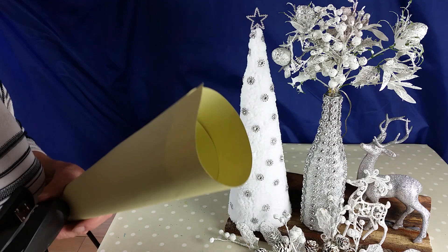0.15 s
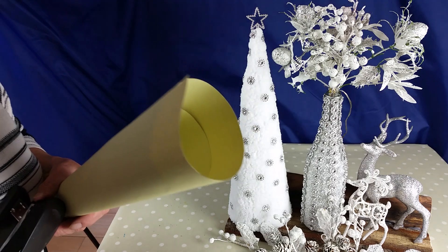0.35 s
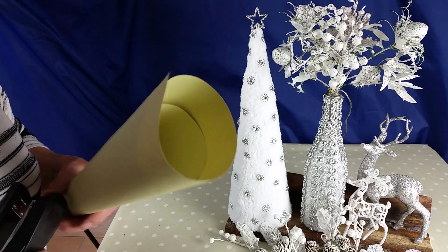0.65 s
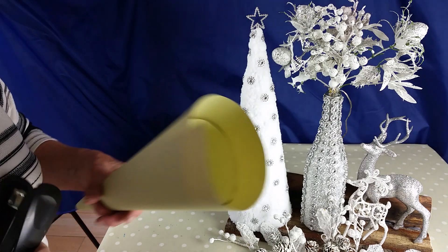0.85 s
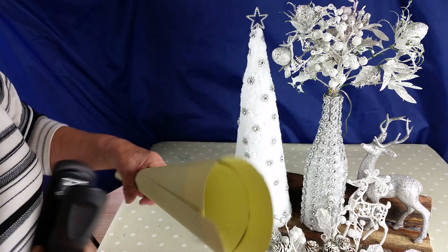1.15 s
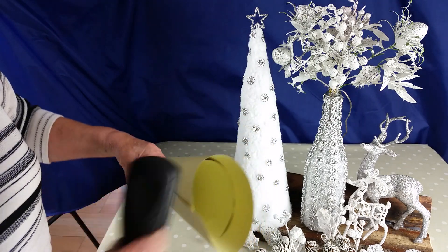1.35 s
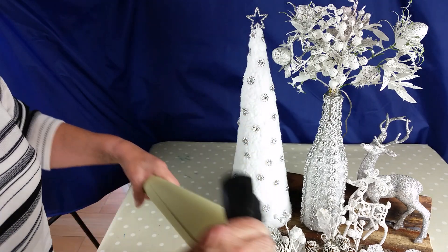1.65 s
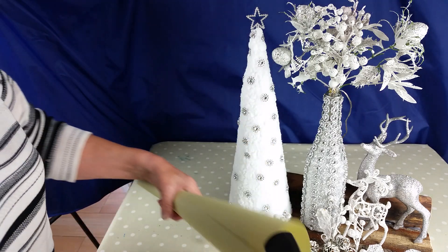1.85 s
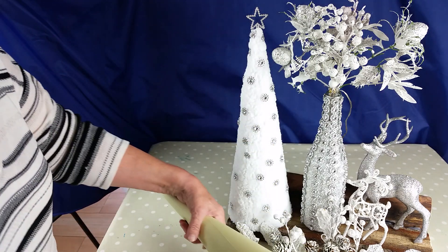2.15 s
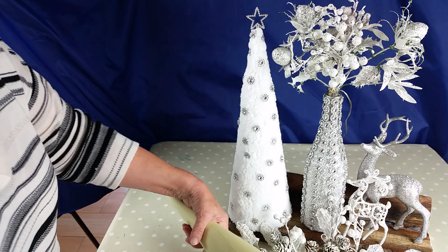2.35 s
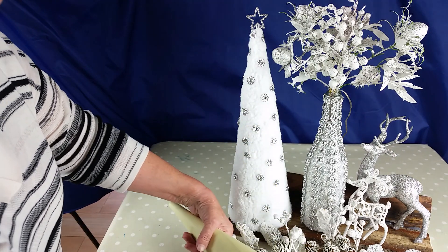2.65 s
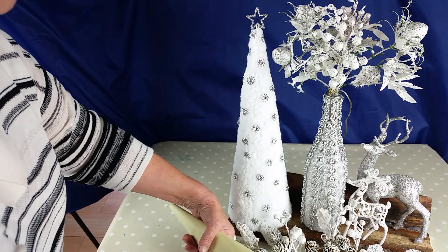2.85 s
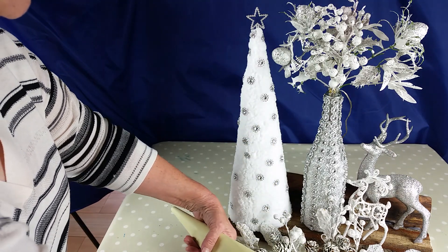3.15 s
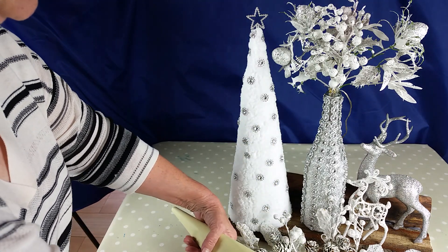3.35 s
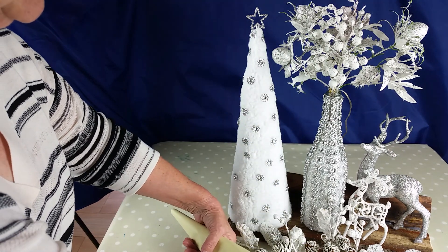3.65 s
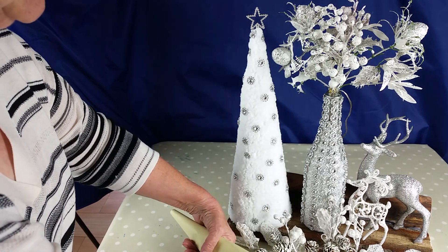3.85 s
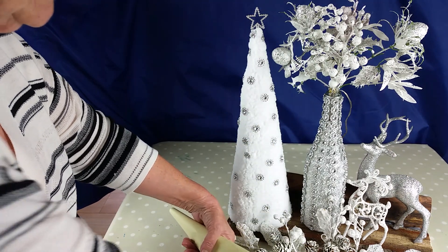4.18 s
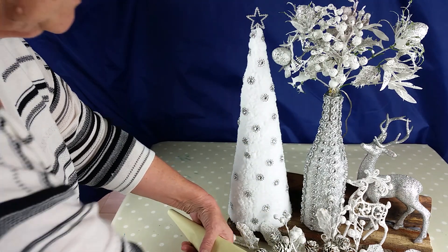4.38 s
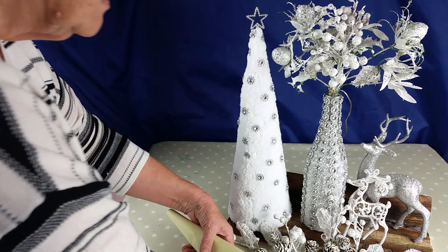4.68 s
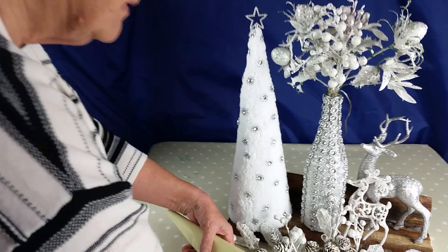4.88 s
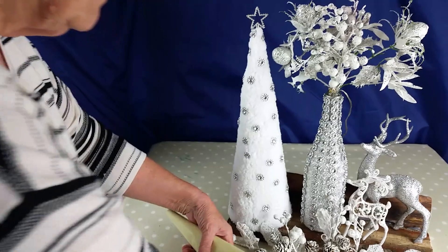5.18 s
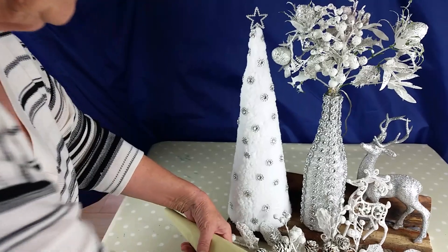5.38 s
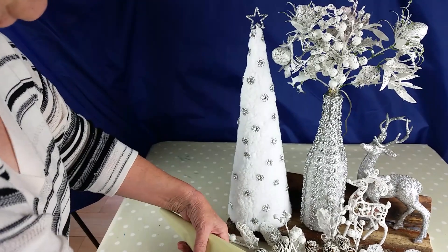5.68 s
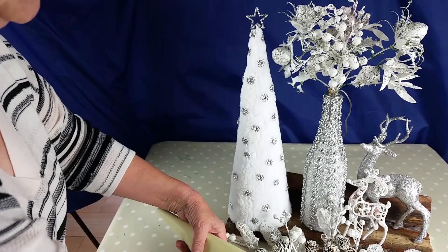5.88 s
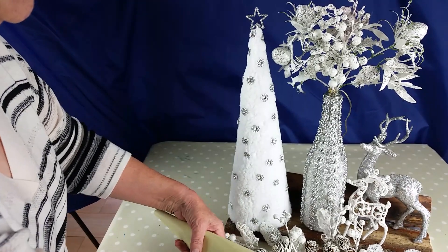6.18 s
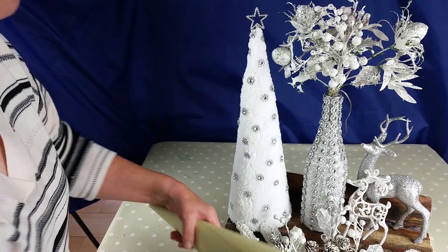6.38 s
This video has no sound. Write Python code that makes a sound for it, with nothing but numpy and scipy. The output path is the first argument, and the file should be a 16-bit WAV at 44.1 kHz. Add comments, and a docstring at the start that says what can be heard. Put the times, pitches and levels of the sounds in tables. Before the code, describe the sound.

A close stereo microphone in a small, slightly reverberant room, with very quiet low background air. From 0 to 1 s hands rub a stiff paper cone with dry, sparse crackles, while a loose stapler arm gives thin metal ticks. From 1 to 2 s it is quieter, with faint ticks and a tiny squeak near 1.6. A hollow paper tap sounds at 2.2, then rustling and smaller taps around 2.6 to 2.9. A firm clack lands at 3.0. At 3.65 to 3.8 the stapler presses shut with clacks, rattle, bright jingle and table boom. A lighter click comes at 4.4, then the loudest cluster at 4.65 to 4.95, heavy and booming. Smaller clacks and a short metallic ping follow at 5.25 to 5.4. Soft paper taps lead to a scrape from 5.9 to 6.2, rising in pitch and ending in a knock; a faint jolt follows at 6.4.

```python
"""Hands rub and tap a stiff paper cone as friction noise and short contacts; the stapler's loose arm ticks and squeaks.
Then the stapler, fitted over the seam, is pressed shut on a cloth-covered table in a small room: it clacks as
bursts ringing its arm, its spring jingles as wavering modes, and the table booms as a bank of decaying modes.
Near the end the stapler scrapes out of the cone, heard as friction and a rising resonance, and a last jolt follows."""
import sys
import numpy as np
from scipy import signal
from scipy.fft import rfft, irfft, next_fast_len
from scipy.io import wavfile

SR = 44100
rng = np.random.default_rng(int(sys.argv[2]) if len(sys.argv) > 2 else 0)


def transcribe(signal):
    """Save signal, clipped to [-1, 1], as a 16-bit WAV file at the path in sys.argv[1]."""
    frames = np.atleast_2d(signal).T
    limited = np.clip(frames, -1, 1)
    pcm = np.round(limited * 32767).astype(np.int16)
    wavfile.write(sys.argv[1], SR, pcm)


N = 287732
TIME = np.arange(N) / SR
BLOW = TIME[:SR // 4]   # time axis of one burst

# steady background air, spectrum: frequency_hz, level_db
AIR_SPECTRUM = [(25, -36), (50, -7.5), (85, 3), (130, 1), (250, -3.5), (370, -6.5), (600, -14), (1000, -26),
                (2000, -28), (3700, -35.5), (5000, -38), (8500, -62), (12500, -37.5), (16000, -41.5)]
AIR_DB = -54
# decay of the room: frequency_hz, t60_s
ROOM_DECAY = [(100, 0.61), (400, 0.37), (1200, 0.43), (4000, 0.4), (8000, 0.45), (14000, 0.28)]
# reverberant level: frequency_hz, level_db
ROOM_LEVEL = [(80, -14), (200, -14), (500, -7.5), (1500, -9.5), (5000, -9.5), (13000, -9.5)]
# balance of the two microphone ports: frequency_hz, left_minus_right_db
PORT_BALANCE = [(60, 0.5), (87, 0.0), (130, 0.0), (180, 0.0), (260, 0.0), (380, 0.0), (550, 0.0),
                (790, 0.0), (1140, 0.5), (1650, 0), (2380, -1), (3440, -4.5), (4970, -9.5), (7180, -6.5),
                (10400, 4), (15000, 0)]
CUTOFF_HZ = 16000

# pushes and knocks on the table: start_s, level_db, hardness_db (upper modes gain what the deepest loses)
TABLE_BLOWS = [(3.644, -7.5, 8.5), (3.700, -8.5, 6), (3.911, -31.5, -2), (4.428, -38, -7),
               (4.705, -17.5, 1), (4.827, -7, 3.5), (4.945, -9, -10), (4.976, -19.5, 6.5),
               (5.266, -27.5, 10.5), (5.369, -24, -3.5), (5.683, -37, 3.5), (5.81, -30, -1),
               (6.143, -24, 9), (6.160, -14, 2), (6.41, -23, -5)]
# modes of the table top: pitch_hz, level_db, t60_s
TABLE_MODES = [(52, -13, 0.55), (80.5, -1.5, 0.28), (139.4, 4, 0.18), (153.8, 2, 0.12), (191.6, -6.5, 0.3),
               (227.7, -10, 0.39), (273.3, 0, 0.2), (331.4, -3.5, 0.19), (372.6, -9, 0.3),
               (397, -14.5, 0.37), (442.2, -10, 0.38), (508, -16.5, 0.34), (556, -29.5, 0.1),
               (658, -20, 0.32)]
THUMP_DEEP_DB, THUMP_UPPER_DB = -10.5, -9   # relative to the main modes
# knock on the hollow case: dB for a thump of 0 dB, dB per dB of thump, decay constant in s
CASE_DB, CASE_GROWTH, CASE_CRUNCH_S = -3.5, 1.414, 0.015

# strokes of the hands over the paper: start_s, length_s, level_db
STROKES = [(-.05, 0.4, -48), (.42, .12, -48), (.6, 0.14, -50.5), (0.795, 0.18, -55.5), (1.097, 0.59, -62.5),
           (2.373, 0.36, -58), (2.666, 0.39, -53.5), (2.826, 0.016, -44), (3.1, .13, -47),
           (3.459, 0.46, -56), (4.1, .2, -67), (4.332, .25, -50), (4.603, .05, -41.5), (5.192, 0.11, -45.5),
           (6.398, .12, -58)]
STROKE_ATTACK_S, STROKE_RELEASE_T60_S = 0.024, 0.58
# rubbed paper, spectrum: frequency_hz, level_db
PAPER_SPECTRUM = [(120, -11), (250, -3), (450, -2), (650, -7), (800, -3.5), (1200, -7.5), (1450, -12),
                  (2800, -19), (4400, -19), (5500, -26), (7000, -32.5), (8400, -49), (12000, -30),
                  (16000, -30.5)]
# the stiff paper cone is tapped or snaps: start_s, click_db, hollow_knock_db
CONE_TAPS = [(0.034, -33.5, -32.5), (0.505, -60, -44), (0.650, -48, -60), (0.738, -47, -40.5),
             (2.190, -27, -21), (2.606, -48, -35), (2.659, -34.5, -28), (2.77, -51, -32.5),
             (2.857, -38, -42), (3.623, -57, -40.5), (5.588, -57, -45), (5.682, -47.5, -40.5),
             (5.942, -47, -37), (5.955, -45, -26)]
# modes of the air in the cone: pitch_hz, level_db, t60_s
CONE_MODES = [(388, -17, 0.53), (474, 0, 0.23), (581, -12, 0.41), (851, -17, 0.52)]
TAP_CRUNCH_S, CONE_LOWEST_HZ = 0.0015, 190
TAP_EDGE_DB, CONE_RING_DB = -46, -13   # relative to the click; relative to the knock

# click of a contact, spectrum: frequency_hz, level_db
CLICK_SPECTRUM = [(400, -29), (700, -2.5), (830, 4), (980, 5.5), (1180, -0.5), (1480, 2), (1640, 0),
                  (1800, 0), (2000, 0.5), (2240, -1), (2650, -7), (3600, -5.5), (4400, -6.5), (5300, -14.5),
                  (6600, -18.5), (7600, -31), (12000, -46)]
# knock on the hollow body, spectrum: frequency_hz, level_db
KNOCK_SPECTRUM = [(60, -53), (150, -13.5), (260, -8), (330, -1.5), (400, -6.5), (470, 0.5), (620, -9.5),
                  (760, -9.5), (950, -8), (1400, -21.5), (4000, -58)]
# bright metal or paper edge, spectrum: frequency_hz, level_db
EDGE_SPECTRUM = [(3000, -22), (4500, -3.5), (5500, -13.5), (6600, -8.5), (8500, -17.5), (10500, -5),
                 (13000, 0.5), (15500, -4.5)]

# the staple spring is shaken: start_s, low_hum_db, high_jingle_db
SPRING_SHAKES = [(3.694, -44, -32), (4.702, -21.5, -47), (4.845, -26.5, -23), (5.29, -30.5, -39.5),
                 (5.361, -34.5, -34), (6.426, -45, -60)]
# low modes of the spring: pitch_hz, peak_db, t60_s
HUM_MODES = [(1210, 0, .24), (1271, -14, .12), (1513, -15, .18), (1915, -17, .2), (2143, -19, .14)]
# high modes of the spring: pitch_hz, peak_db, t60_s
JINGLE_MODES = [(6400, -17, .09), (9598, -16, .09), (11300, -17, .04), (12900, -7, .05), (13005, 0, .085),
                (13120, -8, .05), (15120, -10, .06)]
# the stapler slips in the grip: start_s, length_s, starting_pitch_hz, peak_db
SLIPS = [(1.614, 0.074, 4800, -64), (2.595, 0.0044, 4250, -41.5)]
# the loose arm ticks in the hand: start_s, click_db, arm_ring_db, ring_tilt_db_per_octave
ARM_TICKS = [(0.169, -41, -39.5, 5), (0.295, -49, -39.5, -6), (0.307, -39.5, -38, 0), (0.38, -58, -41, -8),
             (0.884, -41, -36, -1), (1.387, -42.5, -48, 3), (1.444, -43, -49, 3), (1.543, -52, -61, 6),
             (1.687, -60, -67, 6), (2.057, -57.5, -65.5, 13.5), (4.297, -55, -63, 4),
             (4.388, -46.5, -53, 8)]
TICK_CRUNCH_S = 0.01
TICK_KNOCK_DB, TICK_EDGE_DB, TICK_JINGLE_DB = -15.5, -18.5, -15   # relative to the click
# modes of the arm: pitch_hz, level_db, t60_s
ARM_MODES = [(1169, 2, 0.076), (2150, -19, 0.26), (4060, -13, 0.051), (4476, -13.5, 0.035)]
# loose parts rattle while the stapler moves: start_s, length_s, contact_db
RATTLE_RUNS = [(3.647, .1, -35), (4.681, .04, -34), (4.838, .06, -31), (4.949, .035, -36.5),
               (5.277, .007, -26), (5.34, .035, -33.5), (6.158, .04, -32), (6.419, .035, -41)]
RATTLE_GAP_S, RATTLE_SPREAD_DB, RATTLE_CRUNCH_S = 0.008, 2.0, 0.0083
RATTLE_KNOCK_DB, RATTLE_EDGE_DB = -2.5, -6.5   # relative to the click

# the scrape out of the cone: time_s, scrape_db, resonance_db, resonance_hz
SLIDE_CURVE = [(5.90, -65, -55.5, 300), (5.935, -50.5, -44, 420), (5.96, -41, -30, 483),
               (6.0, -36.5, -41, 518), (6.05, -33.5, -49, 1000), (6.09, -34.5, -39, 1300),
               (6.135, -31, -41, 1700), (6.19, -23, -39, 2000), (6.22, -71, -73, 2000)]
# scraped cone, spectrum: frequency_hz, level_db
SCRAPE_SPECTRUM = [(120, -25), (200, -8), (409, -31), (456, -3.5), (709, -18), (933, -2), (1120, -9),
                   (1230, -12), (1680, -16.5), (1870, -13), (2750, -22.5), (4270, -23), (8120, -42.5),
                   (12200, -35.5), (16000, -38)]
# the stapler clacks against cone, anvil and table: start_s, click_db, crunch_s
STAPLER_CLACKS = [(3.019, -16, 0.01), (3.698, -25.5, .0035), (3.746, -23, 0.0078), (3.781, -37, .0017),
                  (4.426, -32.5, 0.005), (4.664, -23, 0.012), (4.696, -17.5, 0.0077),
                  (4.827, -12.5, 0.0042), (4.937, -21, 0.0051), (4.943, -18.5, 0.0035),
                  (5.262, -33, 0.0046), (5.312, -26.5, 0.0022), (5.367, -26, 0.0068), (6.042, -29.5, 0.005),
                  (6.142, -22, 0.002)]
CLACK_KNOCK_DB, CLACK_EDGE_DB, CLACK_RING_DB = -2.5, -14.5, -15   # relative to the click
CLACK_TILT_DB_PER_OCTAVE = 5.5
# the jaw springs open against its stop
STOP_S, STOP_HZ, STOP_DB, STOP_T60_S = 5.366, 1410, -13, 0.024


def from_db(db):
    """Level law: 20 dB is a factor of ten in amplitude."""
    return 10 ** (np.asarray(db) / 20)


def rms_one(x):
    """Normalization: the root mean square becomes 1."""
    return x / np.sqrt(np.mean(x ** 2) + 1e-20)


def at_hz(points, hz):
    """Interpolation: values are joined linearly over logarithmic frequency."""
    known_hz, values = np.transpose(points)
    return np.interp(np.log(np.maximum(hz, 1)), np.log(known_hz), values)


def add(track, start_s, sound):
    """Superposition: a sound is summed into the track at its time."""
    start = round(start_s * SR)
    track[start:start + len(sound)] += sound[:N - start]


def colour(x, spectrum):
    """Minimum phase: a folded cepstrum makes a causal filter with the given spectrum."""
    size = 2 * next_fast_len(len(x))
    gain = from_db(at_hz(spectrum, np.fft.rfftfreq(size, 1 / SR)))
    cepstrum = irfft(np.log(gain))
    cepstrum[1:size // 2] *= 2
    cepstrum[size // 2 + 1:] = 0
    response = np.exp(rfft(cepstrum))
    return irfft(rfft(x, size) * response)[:len(x)]


def dying(t, t60):
    """Exponential decay: the amplitude falls by 60 dB in t60 seconds."""
    return np.exp(-np.log(1000) * t / t60)


def mode(hz, t60):
    """Modal vibration: one second of a damped sine."""
    t = TIME[:SR]
    return np.sin(2 * np.pi * hz * t) * dying(t, t60)


def grains(per_s, spread_db):
    """Dry friction: noise whose strength varies from fibre to fibre."""
    steps = rng.standard_normal(N)
    strength_db = spread_db * np.interp(TIME * per_s, np.arange(N), steps)
    return rng.standard_normal(N) * from_db(strength_db)


def burst(crunch_s, spectrum, snap, ring_db, ring_t60):
    """Impact: a pulse, a crunch of tiny contacts and a dense ring, with the energy of 5 ms at level 1."""
    envelope = np.exp(-BLOW / crunch_s) + from_db(ring_db) * dying(BLOW, ring_t60)
    force = rng.standard_normal(len(BLOW)) * envelope
    force[0] += snap * np.linalg.norm(force)
    sound = colour(force, spectrum)
    return sound / np.linalg.norm(sound) * np.sqrt(0.005 * SR)


def contact(click_db, knock_db, edge_db, crunch_s):
    """Parallel radiation: a contact clicks, knocks on case and cone, and has a bright edge."""
    click = burst(crunch_s, CLICK_SPECTRUM, snap=0.31, ring_db=-8, ring_t60=0.17)
    knock = burst(crunch_s, KNOCK_SPECTRUM, snap=0.43, ring_db=-16, ring_t60=0.31)
    edge = burst(crunch_s, EDGE_SPECTRUM, snap=0.13, ring_db=-7.5, ring_t60=0.091)
    return from_db(click_db) * click + from_db(knock_db) * knock + from_db(edge_db) * edge


def background_air():
    """Stationary random noise: the air has a constant level and spectrum."""
    return from_db(AIR_DB) * rms_one(colour(rng.standard_normal(N), AIR_SPECTRUM))


def room(x, first_echo_s):
    """Diffuse reverberation: a noise tail swells, then dies at its own rate in each octave."""
    t = TIME[:SR]
    tail = np.zeros(SR)
    white, hz = rfft(rng.standard_normal(SR)), np.fft.rfftfreq(SR, 1 / SR)
    onset = 1 - np.exp(-(t / first_echo_s) ** 2)
    for low_hz in 40 * 2 ** np.arange(9):
        octave = irfft(white * ((hz >= low_hz) & (hz < 2 * low_hz)), SR)
        envelope = dying(t, at_hz(ROOM_DECAY, low_hz * np.sqrt(2))) * onset
        tail += octave * envelope / np.linalg.norm(envelope)
    return signal.fftconvolve(x, colour(tail, ROOM_LEVEL))[:N]


def table_boom(load_spread):
    """Modal superposition: neighbours start in opposite directions, so the boom swells; the hand's load detunes them."""
    out = np.zeros(N)
    for start_s, main_db, hard_db in TABLE_BLOWS:
        deep_db = main_db + THUMP_DEEP_DB - hard_db
        upper_db = main_db + THUMP_UPPER_DB + hard_db
        blow = [(86, deep_db), (130, main_db), (170, main_db), (280, upper_db)]   # frequency_hz, level_db
        loads = 1 + load_spread * rng.standard_normal(len(TABLE_MODES))
        for k, (hz, db, t60) in enumerate(TABLE_MODES):
            amplitude = (-1) ** k * from_db(at_hz(blow, hz) + db)
            add(out, start_s, amplitude * mode(hz * loads[k], t60))
        case = burst(CASE_CRUNCH_S, KNOCK_SPECTRUM, snap=0.44, ring_db=-6, ring_t60=0.39)
        add(out, start_s, from_db(CASE_DB + CASE_GROWTH * main_db) * case)
    return out


def handling():
    """Envelope of strokes: each swells, holds and dies away, and the strongest sets the level."""
    strokes = []
    for start_s, length_s, db in STROKES:
        attack = np.clip((TIME - start_s) / STROKE_ATTACK_S, 0, 1)
        release = dying(np.maximum(TIME - start_s - length_s, 0), STROKE_RELEASE_T60_S)
        strokes.append(from_db(db) * attack * release)
    return np.max(strokes, axis=0)


def paper(most_crackles_per_s, crackle_db):
    """Friction and buckling: harder handling makes the rubbed sheet crackle more often, up to a limit."""
    level = handling()
    per_s = most_crackles_per_s * np.minimum(level / level[0], 1)   # the opening level reaches the limit
    pulses = (rng.random(N) < per_s / SR) * (2 * rng.random(N) - 1)
    snap = burst(0.0033, PAPER_SPECTRUM, snap=0.96, ring_db=-18.5, ring_t60=0.05)
    crackles = signal.fftconvolve(pulses, snap)[:N]
    rub = rms_one(colour(grains(per_s=300, spread_db=0.3), PAPER_SPECTRUM))
    return level * (rub + from_db(crackle_db) * crackles)


def taps():
    """Cavity resonance: short paper contacts with little edge or bass leave the air in the cone ringing."""
    out = np.zeros(N)
    hollow = sum(from_db(db) * mode(hz, t60) for hz, db, t60 in CONE_MODES)
    for start_s, click_db, knock_db in CONE_TAPS:
        add(out, start_s, contact(click_db, knock_db, click_db + TAP_EDGE_DB, TAP_CRUNCH_S))
        add(out, start_s, from_db(knock_db + CONE_RING_DB) * hollow)
    high_pass = signal.butter(2, CONE_LOWEST_HZ, "high", fs=SR, output="sos")
    return signal.sosfilt(high_pass, out + 1e-18)


def coil_ring(modes, swell_s, linewidth_hz):
    """Phase diffusion: coils take a moment to get going, and their pitch wavers as they touch."""
    t = TIME[:SR]
    out = np.zeros(SR)
    for hz, db, t60 in modes:
        envelope = (1 - np.exp(-(t / swell_s) ** 2)) * dying(t, t60)
        waver = np.cumsum(rng.standard_normal(SR)) * np.sqrt(2 * np.pi * linewidth_hz / SR)
        tone = np.sin(2 * np.pi * hz * t + waver)
        out += from_db(db) * tone * envelope / envelope.max()
    return out


def jingle():
    """High modal series: the bright ring of the spring."""
    return coil_ring(JINGLE_MODES, swell_s=0.0058, linewidth_hz=40.7)


def spring():
    """Shock excitation: a jolt makes the staple spring hum and jingle."""
    out = np.zeros(N)
    for start_s, hum_db, jingle_db in SPRING_SHAKES:
        hum = coil_ring(HUM_MODES, swell_s=0.0065, linewidth_hz=6.0)
        add(out, start_s, from_db(hum_db) * hum + from_db(jingle_db) * jingle())
    return out


def squeaks(sag):
    """Stick-slip oscillation: a thin short tone falls by the fraction sag."""
    out = np.zeros(N)
    for start_s, length_s, hz, db in SLIPS:
        progress = np.linspace(0, 1, round(length_s * SR))
        phase = 2 * np.pi * np.cumsum(hz * (1 - sag * progress)) / SR
        add(out, start_s, from_db(db) * np.sin(np.pi * progress) * np.sin(phase))
    return out


def arm(tilt_db):
    """Modal excitation: the arm rings, its higher modes weighted by a tilt in dB per octave."""
    out = np.zeros(SR)
    lowest_hz = ARM_MODES[0][0]
    for hz, db, t60 in ARM_MODES:
        out += from_db(db + tilt_db * np.log2(hz / lowest_hz)) * mode(hz, t60)
    return out


def ticks():
    """Coupled vibration: thin metal contacts ring the arm and stir the spring."""
    out = np.zeros(N)
    for start_s, db, ring_db, tilt_db in ARM_TICKS:
        add(out, start_s, contact(db, db + TICK_KNOCK_DB, db + TICK_EDGE_DB, TICK_CRUNCH_S))
        add(out, start_s, from_db(ring_db) * arm(tilt_db))
        add(out, start_s, from_db(db + TICK_JINGLE_DB) * jingle())
    return out


def loose_parts():
    """Repeated impact: a rattle is a run of small bright contacts, uneven in time and strength."""
    out = np.zeros(N)
    for start_s, length_s, level_db in RATTLE_RUNS:
        for after_s in np.arange(0, length_s, RATTLE_GAP_S):
            late, strong = rng.standard_normal(2)
            db = level_db + RATTLE_SPREAD_DB * strong
            hit = contact(db, db + RATTLE_KNOCK_DB, db + RATTLE_EDGE_DB, RATTLE_CRUNCH_S)
            add(out, start_s + after_s + 0.25 * RATTLE_GAP_S * late, hit)
    return out


def slide(width_hz):
    """Friction-driven resonance: its pitch rises as the stapler speeds out of the cone."""
    time_s, *columns = np.transpose(SLIDE_CURVE)
    scrape_db, resonance_db, hz = [np.interp(TIME, time_s, column) for column in columns]
    scrape = rms_one(colour(grains(per_s=700, spread_db=2.5), SCRAPE_SPECTRUM))
    # slow noise on a sine and a cosine makes a narrow band around the moving pitch
    low_pass = signal.butter(2, width_hz, fs=SR, output="sos")
    wander = signal.sosfilt(low_pass, rng.standard_normal((2, N)))
    phase = 2 * np.pi * np.cumsum(hz) / SR
    resonance = rms_one(wander[0] * np.cos(phase) + wander[1] * np.sin(phase))
    moving = (TIME > time_s[0]) & (TIME < time_s[-1])
    return moving * (from_db(scrape_db) * scrape + from_db(resonance_db) * resonance)


def clacks():
    """Impact and modal ring: firm contacts of one colour ring the arm, and the jaw's stop rings once."""
    out = np.zeros(N)
    for start_s, db, crunch_s in STAPLER_CLACKS:
        add(out, start_s, contact(db, db + CLACK_KNOCK_DB, db + CLACK_EDGE_DB, crunch_s))
        add(out, start_s, from_db(db + CLACK_RING_DB) * arm(CLACK_TILT_DB_PER_OCTAVE))
    add(out, STOP_S, from_db(STOP_DB) * mode(STOP_HZ, STOP_T60_S))
    return out


def scene():
    """Superposition at one spot: two microphone ports colour the same sound differently."""
    near = table_boom(load_spread=0.006)
    near += paper(most_crackles_per_s=90, crackle_db=5) + taps()
    near += spring() + squeaks(sag=0.0585) + ticks() + loose_parts()
    near += slide(width_hz=45) + clacks()
    heard = rfft(near + room(near, first_echo_s=0.0072) + background_air(), 2 * N)
    ratio = from_db(at_hz(PORT_BALANCE, np.fft.rfftfreq(2 * N, 1 / SR)))
    left = irfft(heard * 2 * ratio / (1 + ratio))[:N]
    right = irfft(heard * 2 / (1 + ratio))[:N]
    return np.array([left, right])


def record(dry):
    """Band limiting and saturation: the microphone loses deep bass, peaks are rounded and the top is cut."""
    high_pass = signal.butter(3, 42, "high", fs=SR, output="sos")
    dry = signal.sosfilt(high_pass, dry)
    rounded = dry / (1 + (dry / 0.95) ** 6) ** (1 / 6)
    low_pass = signal.ellip(10, 0.2, 80, CUTOFF_HZ, fs=SR, output="sos")
    return signal.sosfilt(low_pass, rounded)


dry = scene()
out = record(dry)
transcribe(out)
```